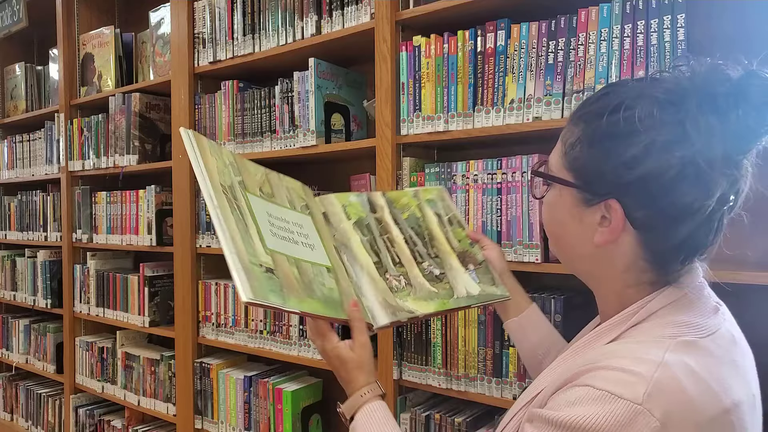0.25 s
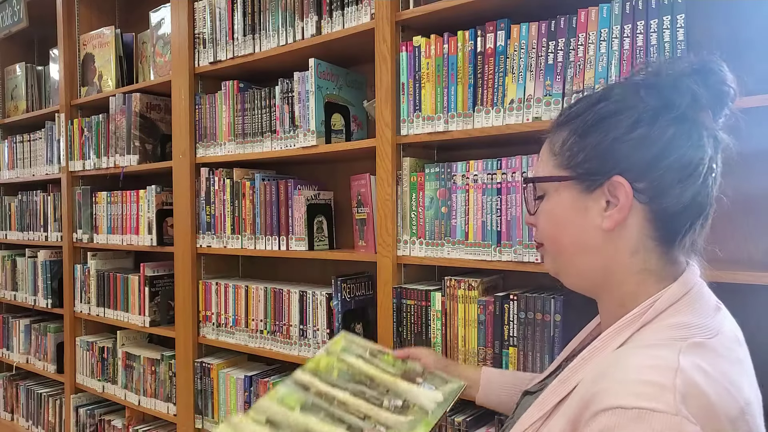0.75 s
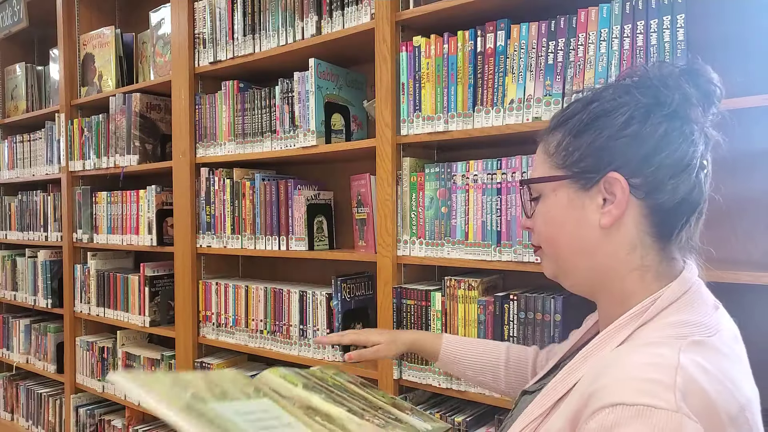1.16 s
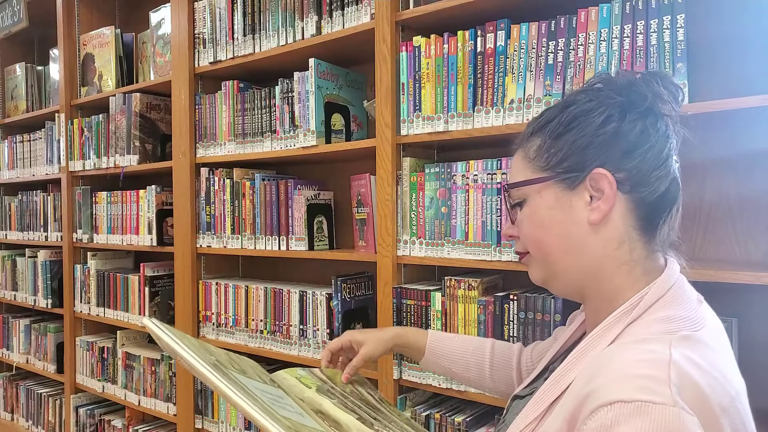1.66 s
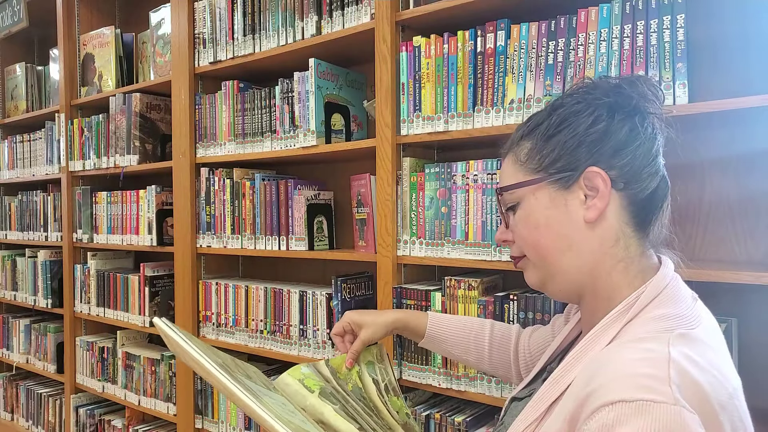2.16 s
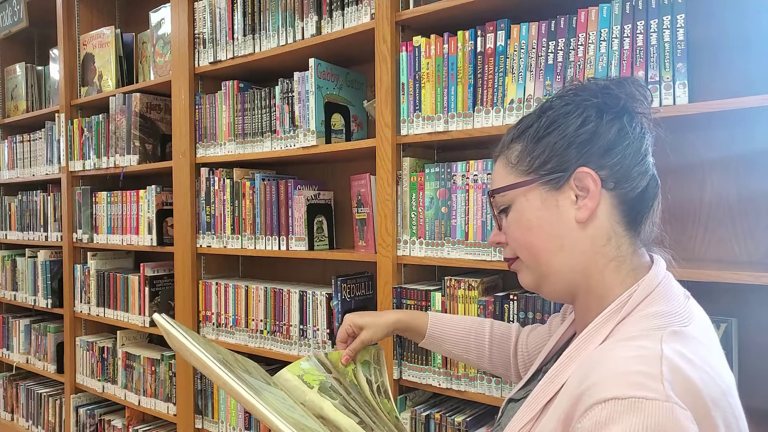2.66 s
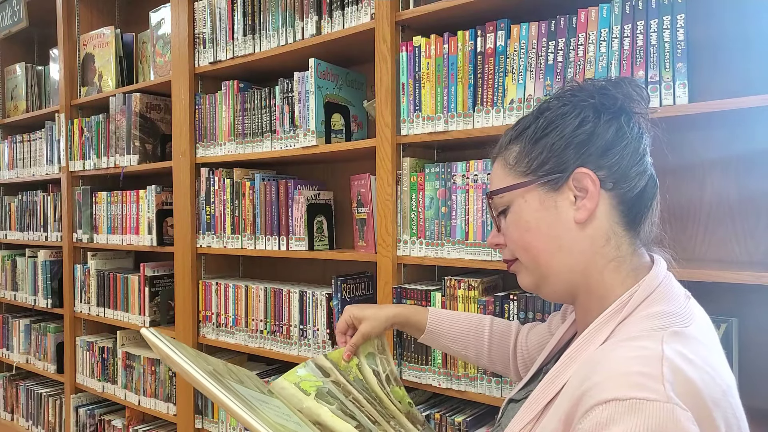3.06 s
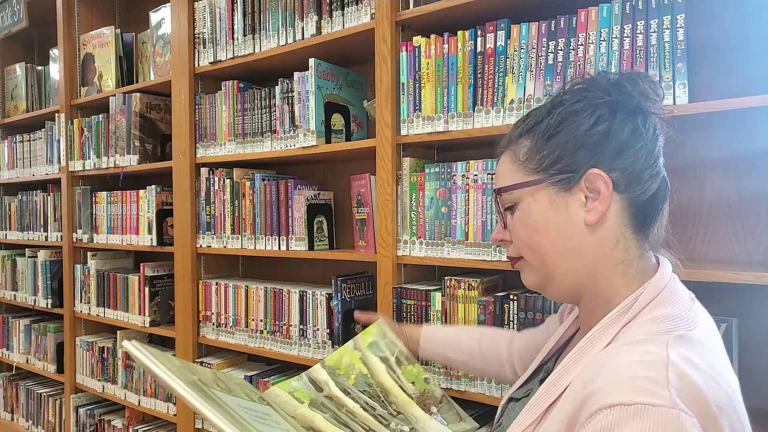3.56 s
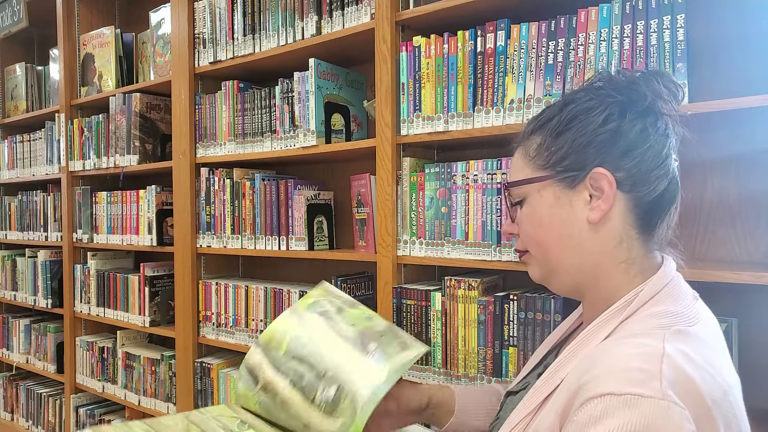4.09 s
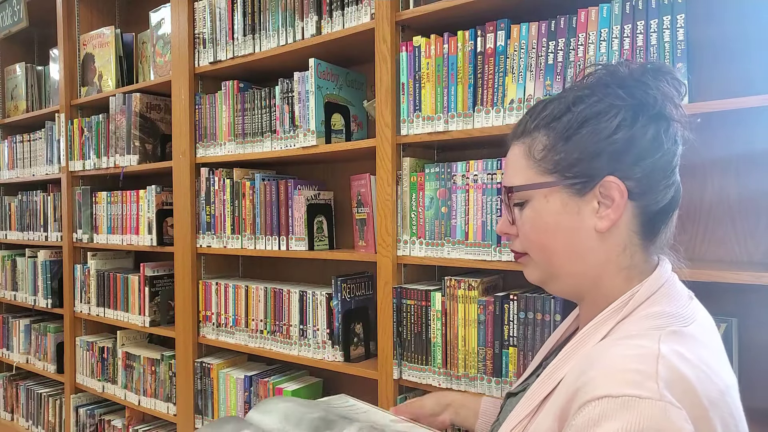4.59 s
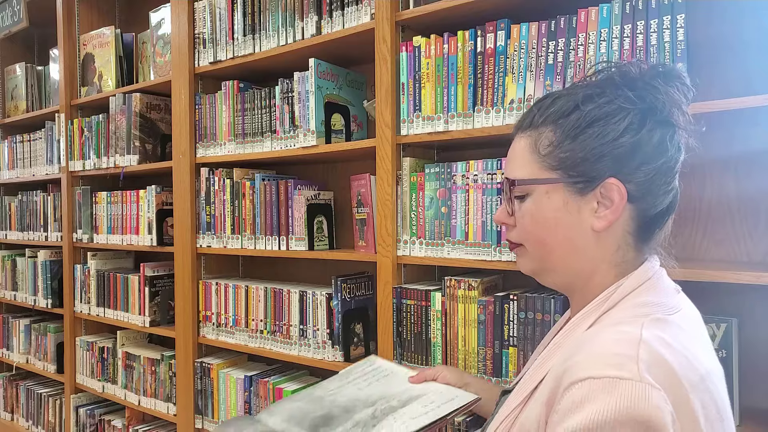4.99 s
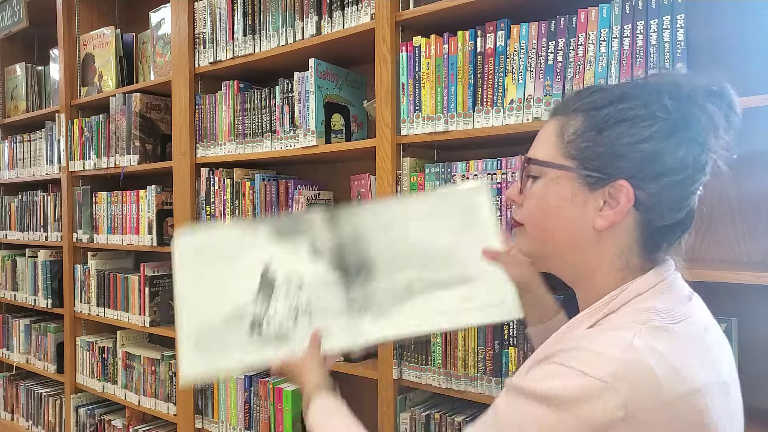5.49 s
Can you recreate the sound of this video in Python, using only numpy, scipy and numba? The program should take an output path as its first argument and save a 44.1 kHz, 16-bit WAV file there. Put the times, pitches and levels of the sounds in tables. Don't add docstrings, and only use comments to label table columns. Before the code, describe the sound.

Large glossy picture-book pages rustle, crinkle and snap as a leaf is picked, turned over and smoothed in a quiet humming room.

```python
import sys
import numpy as np
from scipy import signal
from scipy.io import wavfile
from scipy.ndimage import uniform_filter1d
from numba import njit

SR = 44100
rng = np.random.default_rng(int(sys.argv[2]) if len(sys.argv) > 2 else 0)


def master(y):
    cut = np.clip(np.atleast_2d(y).T, -1, 1)
    pcm = np.round(cut * 32767)
    wavfile.write(sys.argv[1], SR, pcm.astype(np.int16))


def invert_db(x):
    u = np.asarray(x, float) / 20
    return 10 ** u


N = 252770
TIME = np.arange(N) / SR
SIDES = np.array([[1], [-1]])

# start_s [s], peak_db [dB], ring_hz [Hz], crack_db [dB]
SNAPS_PICK = [(0.764, -38, 1450, -48), (0.799, -38, 970, -48), (0.8075, -21, 1335, -46),
              (0.847, -34, 1350, -46), (0.9305, -34, 1900, -35), (0.921, -31, 1380, -30),
              (0.988, -21, 1130, -35), (1.055, -36, 1740, -71), (1.424, -47, 1150, -66),
              (2.263, -33, 760, -49), (2.362, -34, 970, -64), (2.484, -28, 790, -45),
              (2.5155, -18, 744, -44), (2.9785, -36, 790, -36), (3.054, -21, 910, -46),
              (3.1841, -20, 640, -34), (3.271, -35, 940, -42), (3.297, -26, 943, -60),
              (3.318, -13, 960, -27), (3.3438, -15, 1350, -16), (3.3646, -21, 900, -15)]
SNAPS_TURN = [(3.658, -36.5, 572, -60), (3.726, -27.5, 1016, -82), (3.871, -15, 787, -62),
              (3.903, -23, 896, -57), (3.955, -30, 550, -78), (4.13, -42, 744, -34.5),
              (4.3805, -23.5, 527, -38.5), (4.396, -8, 1010, -60), (4.446, -38, 764, -60),
              (4.784, -32, 830, -53), (4.8425, -38, 850, -27), (4.881, -26, 1250, -30),
              (5.003, -48, 1800, -48), (5.051, -35, 1480, -50), (5.1492, -33, 1050, -32)]
# start_s [s], peak_db [dB], ring_hz [Hz]
BUCKLES_PICK = [(0.7995, -43, 980), (0.8116, -41, 1330), (0.8132, -31.5, 1740), (0.816, -38, 1350),
                (0.8469, -34, 935), (0.8493, -32, 1300), (0.9227, -28, 1870), (0.926, -28, 1270),
                (0.9266, -33, 1710), (0.9344, -30, 1490), (0.9465, -31, 1520), (0.9516, -30, 1480),
                (0.9566, -30, 1470), (0.9626, -30, 2390), (0.9691, -30, 1240), (0.9888, -37, 1070),
                (0.991, -35, 1860), (0.9923, -28.5, 1250), (0.9975, -33, 1060), (2.362, -31.5, 890),
                (2.364, -38, 1530), (2.3655, -36.0, 1040), (2.37, -33, 1500), (2.3732, -39, 950),
                (2.3754, -38, 560), (2.4844, -32.5, 840), (2.5164, -24, 680), (2.5255, -29, 760),
                (2.5277, -34, 740), (3.0557, -31.5, 850), (3.065, -32.5, 960), (3.0725, -30.5, 890),
                (3.1843, -27, 905), (3.1848, -24.5, 634), (3.1871, -31, 573), (3.1917, -30.5, 686),
                (3.2157, -39, 420), (3.2999, -25, 965), (3.3203, -19, 890), (3.3446, -25, 1440),
                (3.3455, -28, 730), (3.3469, -34, 885), (3.3545, -24.5, 750), (3.3657, -32, 686),
                (3.3654, -42, 1600), (3.373, -23, 674), (3.3765, -37, 940), (3.3817, -38, 670),
                (3.3848, -25, 935), (3.3877, -22.5, 770), (3.3976, -30, 1060), (3.401, -29.5, 600),
                (3.4044, -30, 970), (3.4114, -37, 470)]
BUCKLES_TURN = [(3.8725, -25.5, 820), (3.8799, -25.8, 735), (3.9039, -17.5, 920), (3.9069, -23.5, 710),
                (3.9089, -34, 900), (3.9134, -17, 860), (3.9169, -38, 583), (3.9169, -25, 930),
                (3.9218, -25, 820), (3.9244, -28, 450), (3.9303, -21.7, 720), (3.9376, -21.5, 730),
                (3.9514, -24, 855), (3.9558, -27, 427), (3.9567, -17, 1530), (3.9573, -27, 930),
                (3.9583, -23.8, 536), (3.9646, -21, 1110), (3.9679, -16.5, 1270), (3.9716, -22, 1570),
                (3.973, -20.5, 634), (3.977, -26, 516), (3.9835, -23, 790), (3.986, -24, 1130),
                (3.99, -23, 577), (3.9975, -33.5, 430), (4.3805, -25, 480), (4.3855, -22, 1380),
                (4.3875, -24.5, 910), (4.3909, -23, 950), (4.3959, -26, 1140), (4.3966, -19, 1665),
                (4.3969, -19, 834), (4.3971, -18, 2360), (4.3984, -14, 1075), (4.3994, -12.5, 1860),
                (4.3999, -27.5, 1440), (4.4049, -20.5, 850), (4.4074, -22, 766), (4.4078, -17.5, 1180),
                (4.4135, -27, 1180), (4.4178, -28.5, 970), (4.4199, -23.5, 785), (4.4239, -28, 1120),
                (4.4282, -19.5, 794), (4.4409, -27, 1530), (4.4437, -18, 1890), (4.4457, -13.5, 1660),
                (4.4485, -13.5, 1350), (4.4488, -32, 725), (4.4527, -24, 1010), (4.4576, -18, 920),
                (4.46, -17.5, 780), (4.4625, -33, 1120), (4.4637, -22, 514), (4.4673, -27, 635),
                (4.4683, -18.5, 1030), (4.4773, -26, 650)]
# start_s [s], peak_db [dB], gloss_db [dB], tail_t60_s [s]
CATCHES_PICK = [(0.064, -44, -43, 0.06), (0.1175, -41, -56, 0.062), (0.14, -39, -35, 0.05),
                (0.1725, -57, -49, 0.063), (0.554, -44.5, -68, 0.037), (0.7233, -39, -41, 0.039),
                (0.7645, -35.5, -32.5, 0.1), (0.812, -26.5, -19, 0.031), (0.93, -28.5, -35, 1),
                (0.987, -27, -52, 0.03), (1.0954, -64, -45, 0.04), (1.133, -48, -60, 0.018),
                (1.194, -46, -58, 0.074), (1.424, -44.5, -41, 0.082), (1.7085, -45, -50, 0.09),
                (1.86, -47.5, -73, 0.095), (2.157, -37, -73, 0.048), (2.361, -32, -49, 0.072),
                (2.4832, -41.5, -45, 0.022), (2.515, -29.5, -46, 0.044), (2.585, -32, -69, 0.2)]
CATCHES_TURN = [(2.6232, -38, -54, 0.12), (2.706, -42, -56, 0.23), (2.978, -25.5, -62, 0.032),
                (3.033, -40.5, -47, 0.03), (3.0643, -29.5, -58, 0.052), (3.073, -29, -47, 0.046),
                (3.0997, -30, -46, 0.03), (3.118, -30.5, -46, 0.12), (3.1848, -28.5, -37, 0.05),
                (3.2135, -37, -46, 0.082), (3.2992, -40, -48, 0.03), (3.3198, -31, -37, 0.025),
                (3.346, -28, -66, 0.093), (3.427, -42, -49, 0.035), (3.948, -36.5, -48, 0.067),
                (4.1535, -49, -56.5, 0.06), (4.462, -30, -55, 0.081), (4.825, -38, -42, 0.042),
                (4.842, -25, -27, 0.25), (4.8834, -24, -44, 0.26), (4.947, -35, -35, 0.044),
                (5.003, -27, -32.5, 0.046), (5.015, -42, -31, 0.045), (5.103, -33, -36.5, 0.26),
                (5.043, -31.5, -35, 0.13), (5.116, -39, -36, 0.05), (5.167, -38, -38, 0.05),
                (5.15, -33, -32, 0.24), (5.278, -39, -39.5, 0.29), (5.344, -38, -43, 0.082),
                (5.536, -43.5, -50, 0.068)]
PAN_DB = -4


def unit(x):
    return x / np.sqrt(np.mean(x ** 2))


def on_log(hz, points):
    curve_hz, curve_db = np.transpose(points)
    return np.interp(np.log(hz), np.log(curve_hz), curve_db)


def cut(x, order, hz, kind):
    return signal.sosfilt(signal.butter(order, hz, kind, fs=SR, output="sos"), x)


def band(x, hz, width_hz, order=1):
    edges = np.clip([hz - width_hz / 2, hz + width_hz / 2], 5, .48 * SR)
    return signal.sosfilt(signal.butter(order, edges, "band", fs=SR, output="sos"), x)


def walk(rate):
    k = int(SR / rate)
    held = rng.standard_normal(3000)[np.arange(N) // k % 3000]
    return 1.2 * uniform_filter1d(uniform_filter1d(held, k), k)


def swells(at_s, db, rise_s, fall_s, rest_db):
    t = TIME[::32]
    since = t - at_s[:, None]
    span = np.clip(np.where(since < 0, rise_s[:, None], fall_s[:, None]), .004, 3)
    power = invert_db(2 * (db[:, None] - 30 * np.abs(since) / span)).sum(axis=0) + invert_db(2 * rest_db)
    return np.interp(TIME, t, 10 * np.log10(power))


def tails(at_s, db, t60_s):
    since = TIME - np.reshape(at_s, (-1, 1))
    fall = np.exp(-np.log(1000) * np.abs(since) / np.clip(t60_s, .01, .4)[:, None])
    return np.sqrt(np.sum((since >= 0) * (invert_db(db)[:, None] * fall) ** 2, axis=0))


@njit
def pops(count, at, hz, cycles, size):
    out = np.zeros(count)
    for k in range(len(at)):
        turn = np.exp((2j * np.pi - 6.9 / cycles[k]) * hz[k] / 44100.)
        z, start = size[k] + 0j, int(at[k])
        for j in range(start, min(count, start + int(cycles[k] * 44100. / hz[k]))):
            z *= turn
            out[j] += z.imag
    return out


def air_handler():
    # pitch_hz [Hz], density_db [dB per Hz]
    air = [(13, -35), (33, 8.5), (74, -6.5), (92, 0.5), (128, -12), (147, -11), (302, -18), (510, -39),
           (653, -77), (1130, -40.5), (2390, -46.5), (5930, -66), (7190, -65.5), (13600, -51), (16000, -30)]
    # pitch_hz [Hz], level_db [dB rms], wobble_db [dB]
    drone = [(34.8, -58.5, 0.5), (68.6, -49.5, 0.36), (119.2, -61.5, 2.3)]
    rumble, swell = 0, walk(2.156)
    for hz in 24 * 2 ** np.arange(0, 9.5, 1 / 3):
        mid, side = band(rng.standard_normal((2, N)), hz, hz / 4, order=2)
        db = on_log(hz, air) + .8 * swell + 1.2 * walk(8)
        rumble = rumble + invert_db(db) * (mid + np.clip(hz / 2500, .14, 1) * side * SIDES)
    tones = 0
    for hz, db, wobble_db in drone:
        level = invert_db(db + wobble_db * walk(16)) * np.sqrt(2)
        phase = 2 * np.pi * hz * TIME + 0.47 * walk(3.0) + .09 * SIDES
        tones = tones + level * np.sin(phase)
    return unit(rumble) * invert_db(-51.5) + tones


def room(x):
    t60_s, level_db, dull_hz = 0.2, -8, 7000
    t = TIME[:SR // 2]
    tail = rng.standard_normal((2, len(t))) * np.exp(-np.log(1000) * t / t60_s) * (t > .004)
    tail = cut(tail, order=1, hz=dull_hz, kind="low")
    differ = cut(tail[0] - tail[1], order=2, hz=600, kind="high") / 2
    tail = tail.mean(axis=0) + differ * SIDES
    tail = invert_db(level_db) * tail / np.sqrt(np.sum(tail ** 2) / 2)
    return signal.fftconvolve(x, tail, axes=1)[:, :N]


def edge():
    # start_s [s], level_db [dB], rise_s [s], fall_s [s]
    whistles = [
        (0.815, -47, .02, .08),
        (2.59, -58, 0.03, .1),
        (2.625, -41.5, 0.054, 0.097),
        (3.39, -46, 0.086, 0.073),
        (3.428, -43, 0.014, 0.015),
        (4.458, -49, .04, .06),
    ]
    # start_s [s], peak_db [dB], ring_hz [Hz]
    gloss_specks = [
        (1.4248, -42, 13000),
        (1.7118, -35, 10600),
        (4.8243, -20, 12900),
        (4.8424, -14, 11000),
        (4.907, -32, 14000),
        (5.0155, -23, 11500),
        (5.1485, -28, 13200),
    ]
    # start_s [s], peak_db [dB], ring_hz [Hz]
    nicks = [
        (.8108, -28, 5500),
        (2.9795, -31, 3600),
        (2.3478, -38, 650),
        (2.1, -38, 900),
        (4.1545, -32, 2300),
        (3.4, -35, 5500),
    ]
    mid, side = band(rng.standard_normal((2, N)), 3870, 680, order=2)
    hiss = unit(mid + 0.5 * side * SIDES) * invert_db(swells(*np.transpose(whistles), -120))
    at_s, peak_db, gloss_db, _ = np.transpose(CATCHES_PICK + CATCHES_TURN)
    click_db = (peak_db + gloss_db) / 2 - 9
    clicks = pops(N, at_s * SR, np.full_like(at_s, 6500), np.full_like(at_s, 2.3), invert_db(click_db))
    speck_s, speck_db, speck_hz = np.transpose(gloss_specks + nicks)
    specks = pops(N, speck_s * SR, speck_hz, np.full_like(speck_s, 6), invert_db(speck_db + 1.5))
    return (hiss + specks + cut(clicks, order=2, hz=2500, kind="high")) * invert_db(PAN_DB * .5 * SIDES)


def fingers():
    # start_s [s], scrape_db [dB], rise_s [s], fall_s [s], gloss_over_scrape_db [dB]
    rubs_pick = [(0.08, -52.5, 0.05, 0.28, -4.5), (0.189, -43.5, 0.16, 0.14, -2),
                 (0.42, -72.5, 0.17, 0.27, -2), (0.565, -56.5, 0.042, 0.14, -2.5),
                 (0.72, -56, 0.35, 0.27, -0.5), (0.809, -40.5, 0.06, 0.13, 2.5),
                 (0.865, -40.5, 0.18, 0.04, -9), (0.94, -41.5, 0.027, 0.078, 5.5),
                 (1.0, -66, .2, 0.084, -6), (1.1, -65, 0.017, 0.16, 6), (1.208, -52, 0.047, 0.15, -7),
                 (1.43, -60, 0.035, 0.28, -3.5), (1.71, -61, 0.03, 0.31, 2), (2.051, -39, 0.12, 0.13, -19),
                 (2.15, -48, 0.2, 0.28, -19.5), (2.238, -47.5, 0.24, 0.081, -6),
                 (2.38, -59.5, 0.14, 0.22, -9), (2.616, -41, 0.085, 0.31, -6.5),
                 (2.72, -37, 0.14, 0.2, -12), (2.785, -45, 0.25, 0.031, -19),
                 (2.969, -42, 0.24, 0.078, -10), (3.08, -45, 0.09, 0.12, -8.5),
                 (3.15, -47.5, 0.2, 0.029, -6.5), (3.375, -49, 0.099, 0.22, -7.5)]
    rubs_turn = [(3.72, -59, 1, 0.53, -6.5), (3.82, -74.5, 0.18, 0.1, 8), (3.99, -55.5, 0.19, 0.85, -8),
                 (4.16, -50, 0.046, 0.26, -22), (4.3, -70.5, 0.95, 0.14, 10.5),
                 (4.474, -45.5, 0.13, 0.21, -5), (4.854, -40.5, 0.11, 0.088, 0.5),
                 (4.914, -50.5, 0.16, 0.09, 10.5), (5.01, -50, 0.06, 0.2, 4.5),
                 (5.07, -48, 0.16, 0.12, -20), (5.23, -56.5, 0.55, 0.59, -3),
                 (5.45, -58.5, 0.15, 0.71, -13), (5.599, -59, 0.1, 0.075, 0)]
    # start_s [s], rasp_db [dB], rise_s [s], fall_s [s]
    drags = [
        (.936, -38.5, .02, 0.1),
        (2.63, -36, 0.1, 0.14),
        (2.69, -39, .03, 0.18),
        (4.92, -45, .06, 0.073),
        (3.38, -39, 0.081, 0.12),
        (3.427, -32.5, 0.0089, 0.017),
        (4.055, -53.5, 0.054, 0.05),
        (4.393, -25, 0.031, 0.031),
    ]
    # pitch_hz [Hz], density_db [dB per Hz]
    rasp_colour = [(2100, -6), (2600, 1), (3200, -4)]
    scrape_colour = [(3400, -3.5), (4000, 4), (4800, -4.5), (6000, 1), (6700, -16.5), (7300, -46.5)]
    gloss_colour = [(6300, -1), (7300, -14.5), (9000, 1), (11000, -7.5), (13500, -0.5), (15500, -4)]
    rest_db, gloss_quicker = -74, 1.05
    rub_s, rub_db, rise_s, fall_s, shine_db = np.transpose(rubs_pick + rubs_turn)
    scrape_db = swells(rub_s, rub_db, rise_s, fall_s, rest_db)
    gloss_db = swells(rub_s, rub_db + shine_db, rise_s / gloss_quicker, fall_s / gloss_quicker, rest_db - 4)
    rasp_db = swells(rub_s, rub_db - 9.5 - 0.46 * shine_db, rise_s, fall_s, rest_db - 6)
    drag_db = swells(*np.transpose(drags), -120)
    rasp_db = 20 * np.log10(np.hypot(invert_db(rasp_db), invert_db(drag_db)))
    pan_db = PAN_DB + 0.0041 * np.maximum(-48 - scrape_db, 0)
    at_s, peak_db, catch_db, t60_s = np.transpose(CATCHES_PICK + CATCHES_TURN)
    slips = np.minimum(rng.exponential(size=N // 8 + 1), 4).repeat(8)[:N]
    grit = unit(invert_db(3.1 * slips + 2.42 * walk(130) + .5 * walk(28.54)))
    # colour, stroke level, catch level, extra lean to the left (dB)
    layers = [(rasp_colour, rasp_db - 8.5, peak_db - 20, -3.5),
              (scrape_colour, scrape_db - 5.5, peak_db - 16.5, -.8),
              (gloss_colour, gloss_db, catch_db - 11, 3.3)]
    out = 0
    for points, db, jump_db, lean_db in layers:
        noise = 0
        for hz in np.geomspace(points[0][0], points[-1][0], len(points) + 1):
            mid, side = band(grit * rng.standard_normal((2, N)), hz, hz / 5, order=2)
            drifting = invert_db(on_log(hz, points) + 2.3 * walk(14))
            noise = noise + drifting * (mid + np.minimum(hz / 5000, .85) * side * SIDES)
        tick = tails(at_s + 0.00039, jump_db - 0.5, t60_s / 10)
        level = np.hypot(invert_db(db), tails(at_s, jump_db, t60_s)) + tick
        out = out + invert_db((pan_db + lean_db) * .5 * SIDES) * unit(noise) * level
    return out


def small_patches():
    # start_s [s], pops_db [dB], rise_s [s], fall_s [s], stiffness_db [dB]
    bends_pick = [(0.19, -52.5, 0.3, 0.19, -3.5), (0.56, -80, 0.018, 0.68, 19.5),
                  (0.684, -55.5, 0.022, 0.13, -2), (0.85, -54, 0.36, 0.092, 11),
                  (0.922, -49, 0.01, 0.15, 16), (0.948, -41.5, 0.013, 0.042, -36),
                  (0.99, -50.5, 0.13, 0.059, 14.5), (1.43, -70.5, 0.015, 0.18, 12),
                  (1.72, -69, 0.13, 0.32, 5), (1.977, -52.5, 0.085, 0.073, -7), (2.07, -45, 0.18, 0.41, -5),
                  (2.22, -48, 0.42, 0.19, -10), (2.367, -34.5, 0.037, 0.029, -4.5),
                  (2.421, -48.5, 0.066, 0.14, -31), (2.53, -60, .03, .15, -4),
                  (2.62, -49.5, 0.12, 0.18, -1.5), (2.76, -46, 0.39, 0.13, -4),
                  (2.98, -44.5, 0.2, 0.082, 0.5), (3.079, -35.5, 0.098, 0.15, -13),
                  (3.15, -55.5, 0.09, 0.036, 4.5), (3.199, -36.5, 0.018, 0.13, -13.5),
                  (3.388, -26.5, 0.16, 0.073, -15)]
    bends_turn = [(3.667, -46.5, .025, .12, -20), (3.73, -44.5, 0.13, 0.29, -19.5),
                  (3.878, -27.5, 0.046, 0.072, -19.5), (3.908, -23, 0.025, 0.024, -5.5),
                  (3.957, -24, 0.071, 0.095, -11), (4.059, -39, 0.14, 0.032, -20),
                  (4.161, -42.5, 0.073, 0.04, -25.5), (4.241, -48, 0.22, 0.09, -20.5),
                  (4.384, -27, 0.018, 0.057, 7.5), (4.399, -24, 0.018, 0.031, 5.5),
                  (4.426, -40, 0.041, 0.013, -4), (4.441, -26, 0.012, 0.062, 8),
                  (4.462, -34, 0.06, 0.16, -6), (4.732, -53, 0.016, 0.14, -13),
                  (4.792, -39, 0.031, 0.053, -12), (4.86, -45, 0.1, 0.22, 9),
                  (5.004, -55, 0.024, 0.075, 11), (5.05, -51.5, 0.028, 0.17, 3.5),
                  (5.103, -48.5, 0.021, 0.086, 10.5), (5.154, -52, 0.017, 0.21, 6.5),
                  (5.3, -59, 0.3, 0.26, 2.5), (5.506, -44.5, 0.087, 0.045, -10),
                  (5.6, -66.5, 0.071, 0.16, 4)]
    pop_hz = (250, 790, 2300)
    rest_db, rest_flop_db = -78, -58
    stiff_quicker = 1.43
    spent_s = 0.0093
    bend_s, bend_db, rise_s, fall_s, stiff_db = np.transpose(bends_pick + bends_turn)
    low_db = swells(bend_s, bend_db, rise_s, fall_s, rest_db)
    flop_db = swells(bend_s, bend_db - 11 - 0.57 * stiff_db, rise_s, fall_s, rest_flop_db)
    high_db = swells(bend_s, bend_db + stiff_db, rise_s / stiff_quicker, fall_s / stiff_quicker, rest_db)
    snap_s, peak_db, ring_hz, _ = np.transpose(SNAPS_PICK + SNAPS_TURN)
    shower = tails(snap_s, peak_db - 8.5, 17.6 / ring_hz)

    when, pitch, strength, length, spot = rng.random((20000, 5)).T
    at = (when * (N - 1)).astype(int)
    hz = 100 * (2400 / 100) ** pitch
    place = np.interp(np.log(hz), np.log(pop_hz), [-1, 0, 1])
    slope_db = np.where(place > 0, high_db[at] - low_db[at], low_db[at] - flop_db[at])
    size = np.hypot(invert_db(low_db[at] + slope_db * place), shower[at] * invert_db(-14 * np.abs(place)))
    size *= invert_db(2.96 * np.minimum(-np.log(strength), 3) - 5.5) * (hz / 900) ** 1.094
    buckle_s, _, _ = np.transpose(BUCKLES_PICK + BUCKLES_TURN)
    spent = tails(buckle_s - spent_s / 2, 0 * buckle_s, np.full_like(buckle_s, 4 * spent_s))
    small = hz > 400
    size *= invert_db(-3 * np.minimum(2 * spent[at], 1) * small)
    cycles = 7 + 14 * length
    lag = np.round(8.8 * (spot - .5))
    flops = pops(N, 1. * at, hz, cycles, size * ~small)
    crowd = np.array([pops(N, np.maximum(at + side * lag, 0.), hz, cycles, size * small)
                      for side in (1, -1)])
    return crowd, flops


def snapping():
    at_s, peak_db, ring_hz, crack_db = np.transpose(SNAPS_PICK + SNAPS_TURN)
    buckle_s, buckle_db, buckle_hz = np.transpose(BUCKLES_PICK + BUCKLES_TURN)
    give = (at_s + .0012) * SR
    gap_s = np.abs(give[:, None] / SR - buckle_s)
    alone = gap_s.min(axis=1) > .003
    snap = pops(N, give, ring_hz, np.full_like(at_s, 26), invert_db(peak_db - 5.5) * alone)
    fresh = (np.diff(buckle_s, prepend=0) > .009) & (gap_s.min(axis=0) < .003)
    cycles = np.where(fresh, 8.8, 17.1)
    size = invert_db(buckle_db - 1.9 + 2.9 * fresh)
    apart = np.round(1.4 * (rng.random(len(buckle_s)) - .5))
    buckles = np.array([pops(N, (buckle_s - .0004) * SR + side * apart, buckle_hz, cycles, size)
                        for side in (1, -1)])
    knock = pops(N, give + 130, ring_hz, np.full_like(at_s, 36), invert_db(peak_db - 26))
    crack = pops(N, give, np.full_like(at_s, 1900), np.full_like(at_s, 1.09), invert_db(crack_db + 12))
    return snap + buckles + knock, crack


def sheet():
    crowd, flops = small_patches()
    panels, crack = snapping()
    patches = cut(crowd + panels, order=4, hz=337, kind="high") * invert_db(-.9 * SIDES)
    patches = cut(patches + flops, order=6, hz=2640, kind="low")
    crack = cut(cut(crack, order=1, hz=500, kind="high"), order=3, hz=5200, kind="low")
    return cut(patches + crack, order=2, hz=91, kind="high")


def scene():
    book = sheet() + fingers()
    return book + room(book) + air_handler() + edge()


def roll_off(x):
    return signal.sosfilt(signal.butter(12, 17010, fs=SR, output="sos"), x)


def record(dry):
    # pitch_hz [Hz], threshold_db [dB per bin]
    gate = [(7000, -108), (11000, -104), (13000, -92), (14500, -83), (16000, -82.5)]
    rounded = np.tanh(1.2 * dry) / 1.2
    topped = signal.sosfilt(signal.ellip(10, .2, 80, 15750, fs=SR, output="sos"), rounded)
    hz, _, z = signal.stft(topped, SR, nperseg=2048)
    hz, frames = hz[1:, None], z.shape[2]
    power = np.mean(np.abs(z) ** 2, axis=0)
    bands = power[:-1].reshape(32, 32, -1).mean(axis=1).repeat(32, axis=0)
    masking = (power[20:120].mean(axis=0) / invert_db(-150)) ** 0.074
    limit = invert_db(2 * on_log(hz, gate)) * np.maximum(masking, 1) * (hz > 6900)
    ragged = invert_db(9 * rng.standard_normal((64, frames))).repeat(16, axis=0)
    drift = walk(7)[::1024][np.arange(frames) % (N // 1024)]
    ragged = ragged * invert_db(4.1 * drift * np.clip(hz / 6000 - 1.5, 0, 1))
    z[:, :-1] *= (bands > limit * ragged) | (power[:-1] > 2.5 * limit)
    mix = signal.istft(z, SR, nperseg=2048)[1][:, :N]
    return roll_off(mix)


dry = scene()
out = record(dry)
master(out)
```